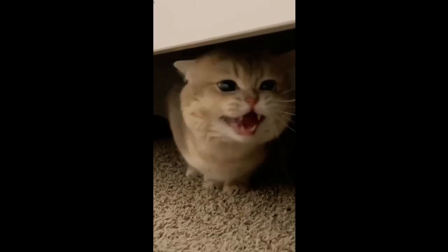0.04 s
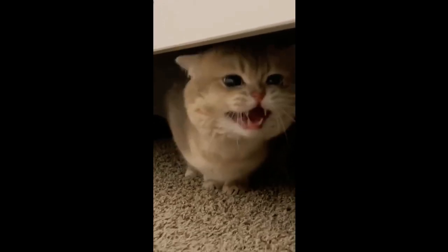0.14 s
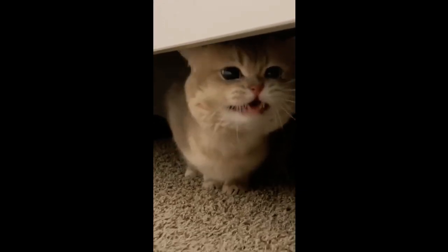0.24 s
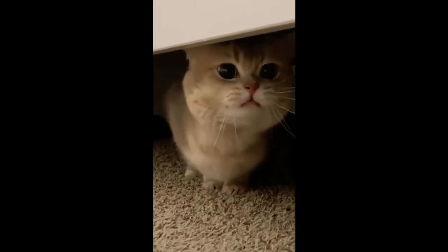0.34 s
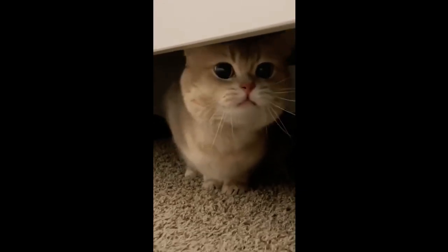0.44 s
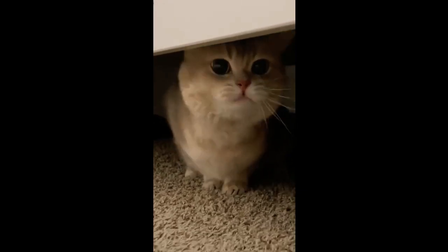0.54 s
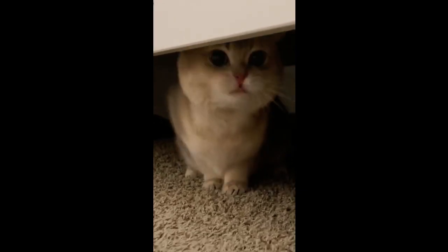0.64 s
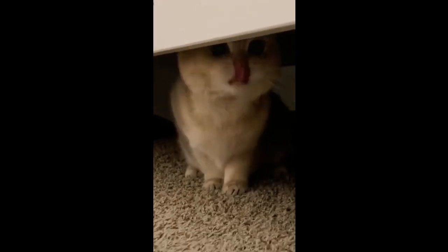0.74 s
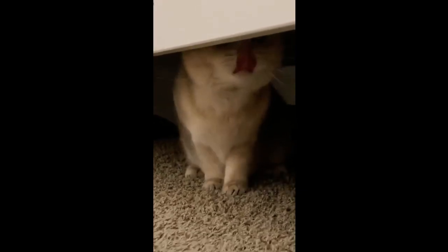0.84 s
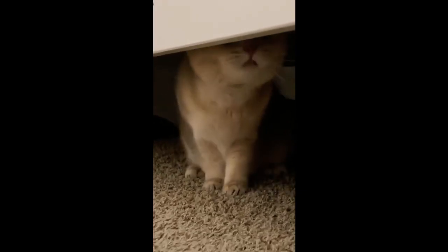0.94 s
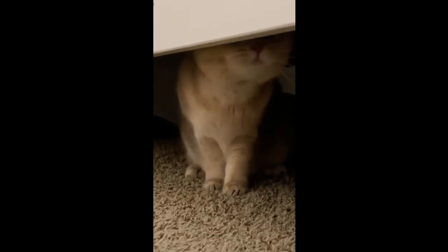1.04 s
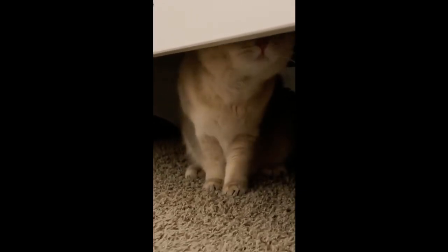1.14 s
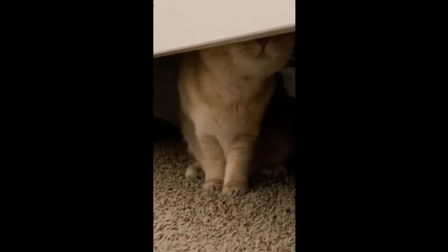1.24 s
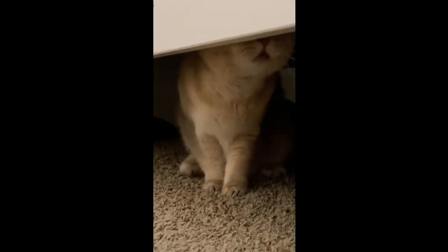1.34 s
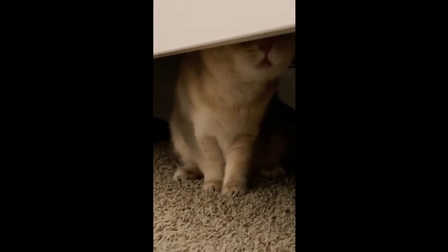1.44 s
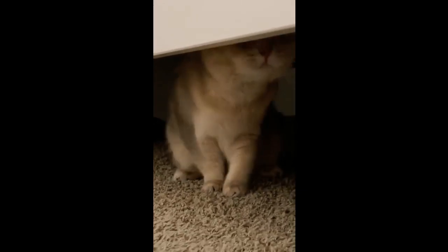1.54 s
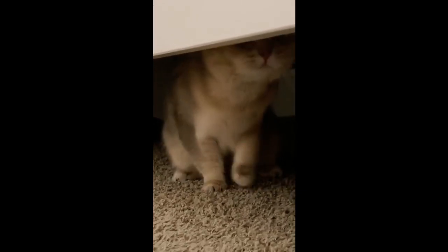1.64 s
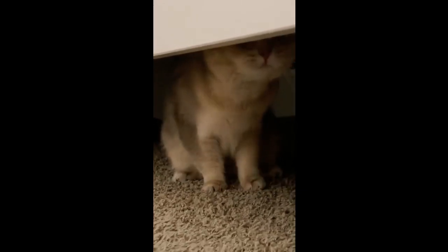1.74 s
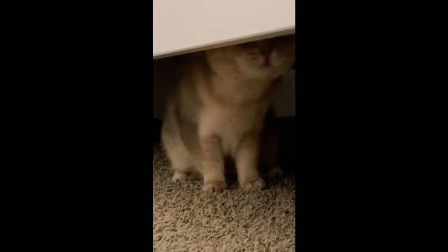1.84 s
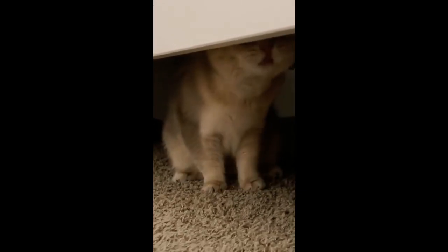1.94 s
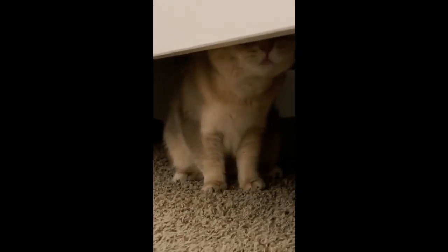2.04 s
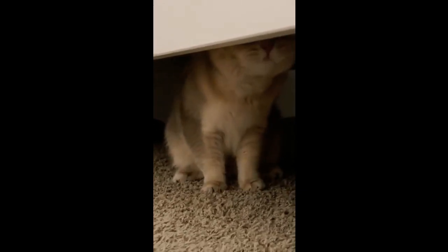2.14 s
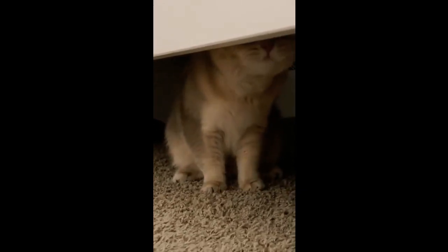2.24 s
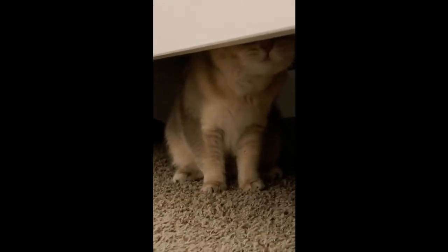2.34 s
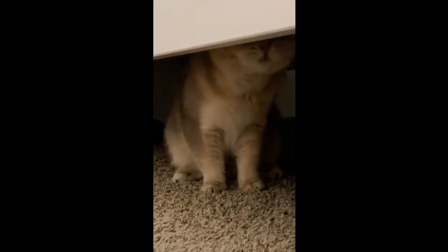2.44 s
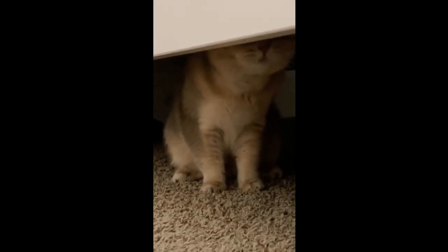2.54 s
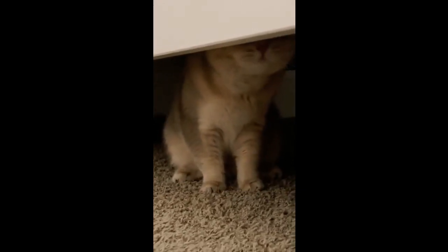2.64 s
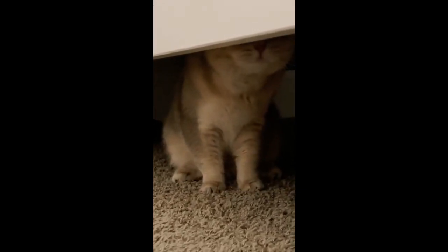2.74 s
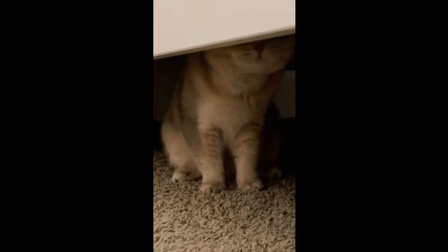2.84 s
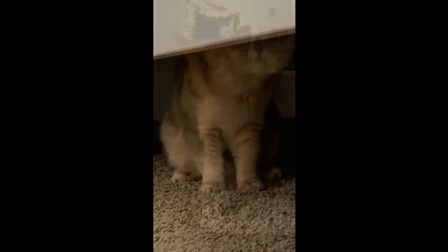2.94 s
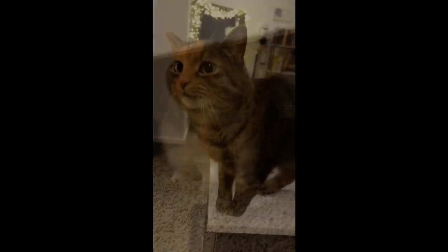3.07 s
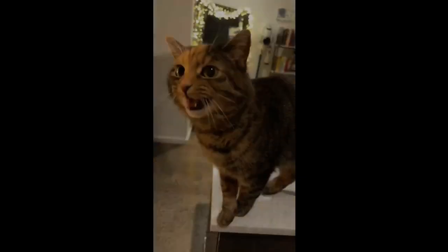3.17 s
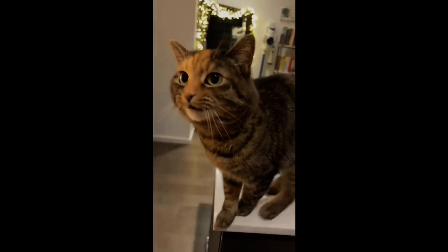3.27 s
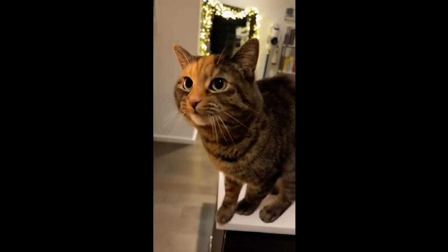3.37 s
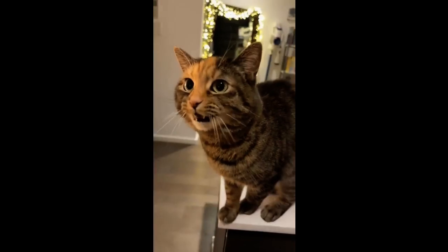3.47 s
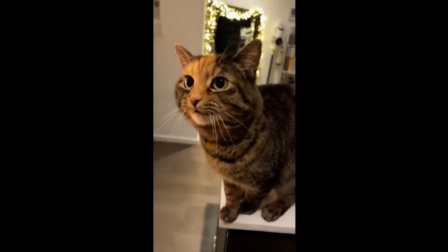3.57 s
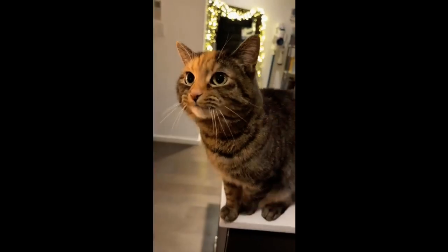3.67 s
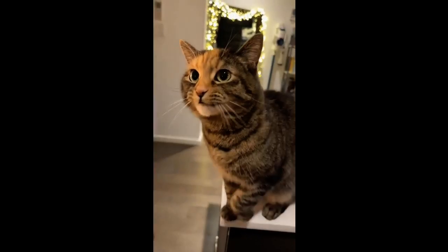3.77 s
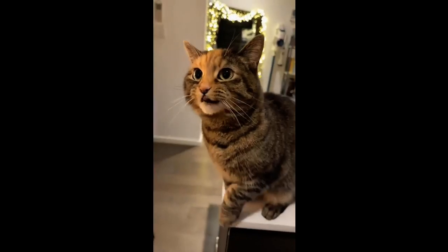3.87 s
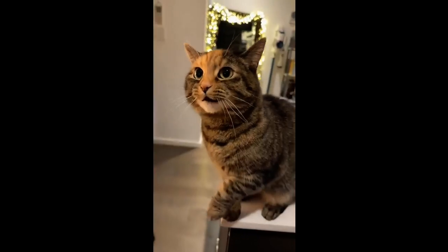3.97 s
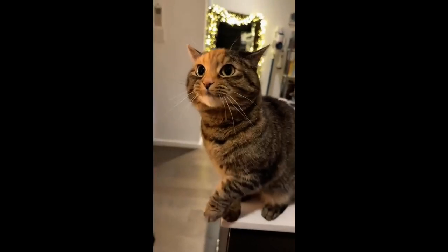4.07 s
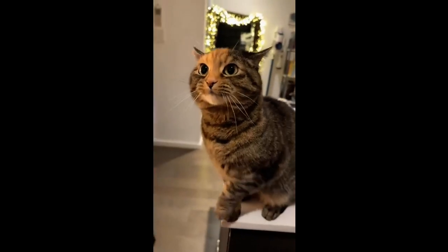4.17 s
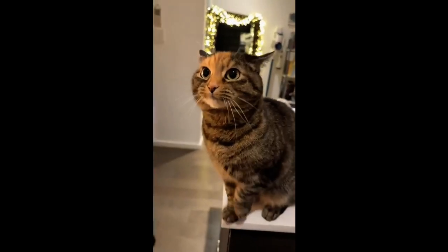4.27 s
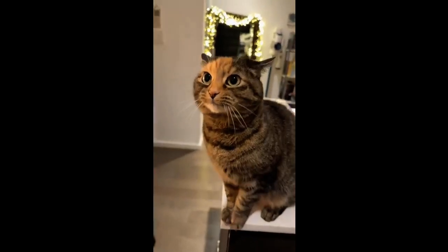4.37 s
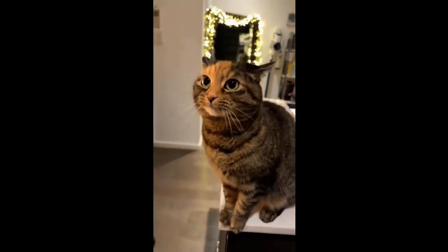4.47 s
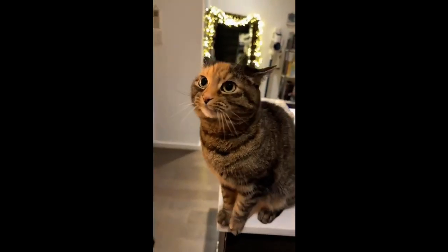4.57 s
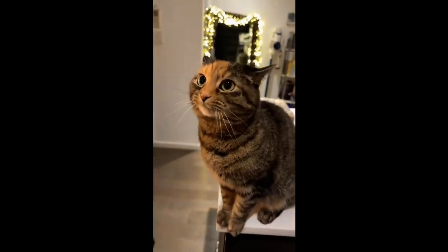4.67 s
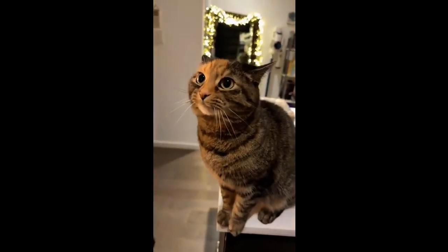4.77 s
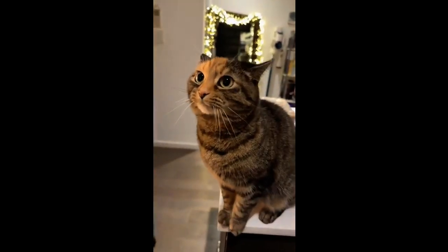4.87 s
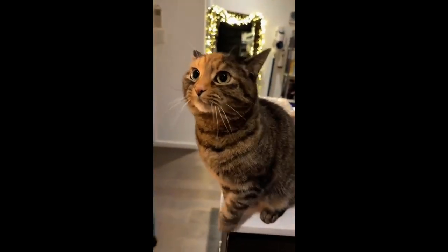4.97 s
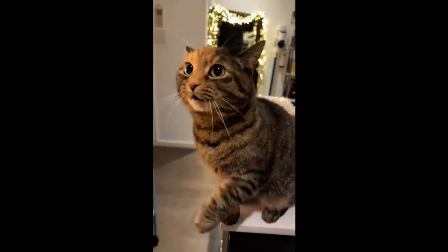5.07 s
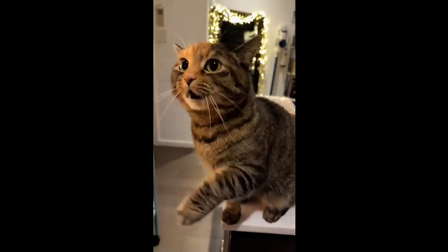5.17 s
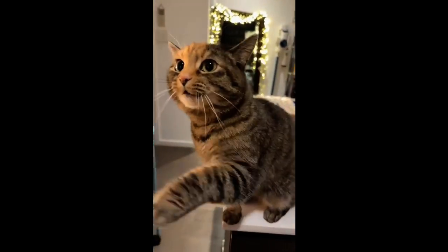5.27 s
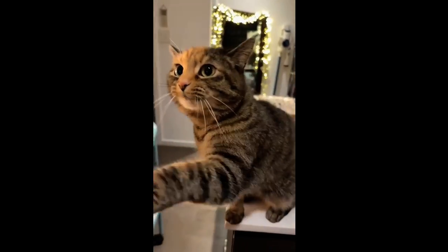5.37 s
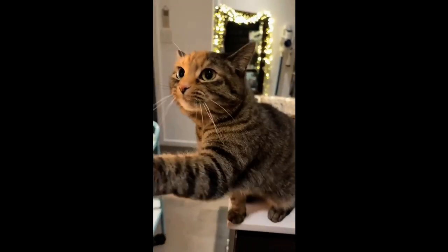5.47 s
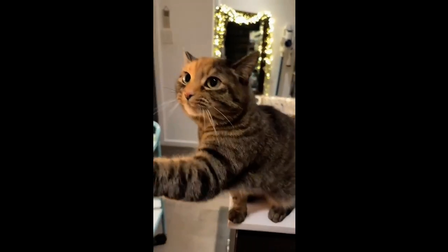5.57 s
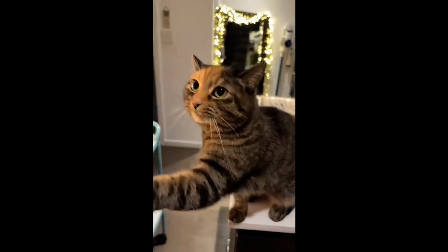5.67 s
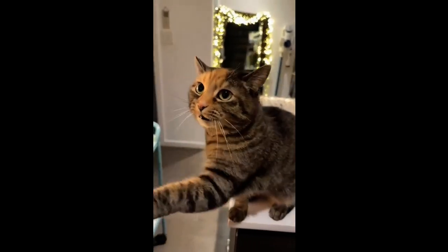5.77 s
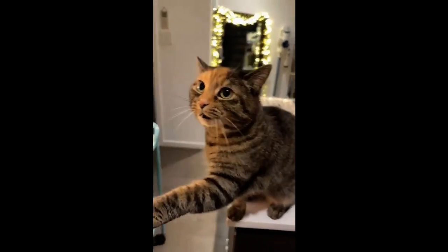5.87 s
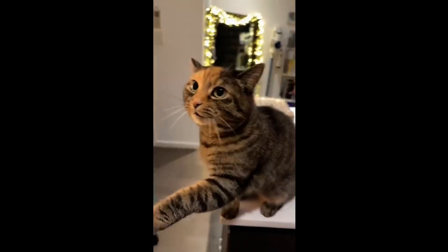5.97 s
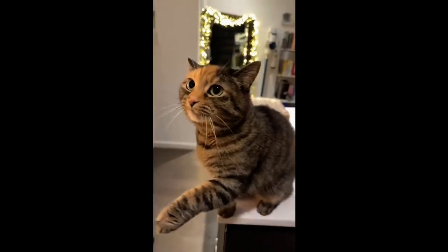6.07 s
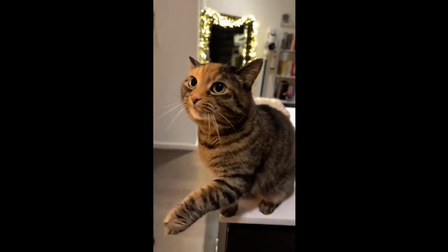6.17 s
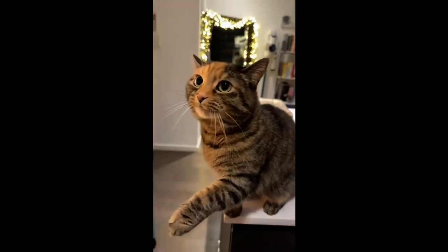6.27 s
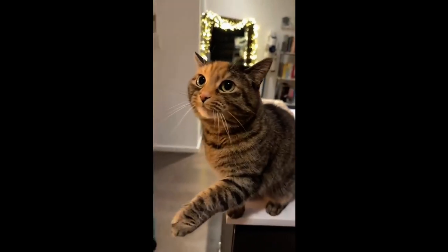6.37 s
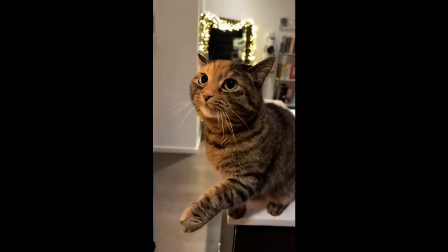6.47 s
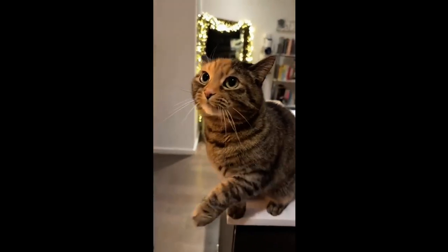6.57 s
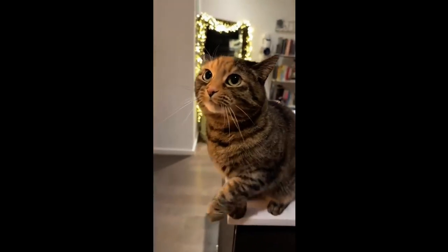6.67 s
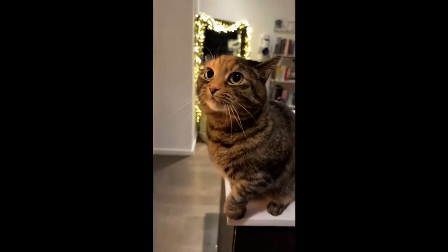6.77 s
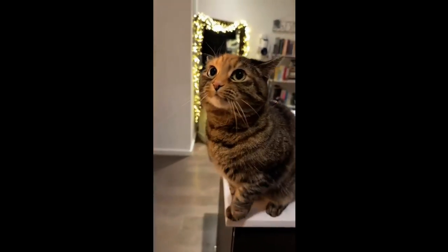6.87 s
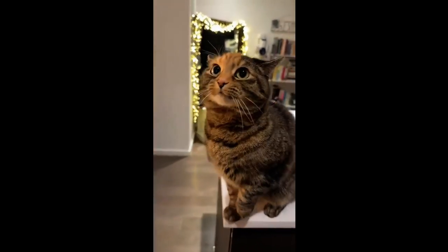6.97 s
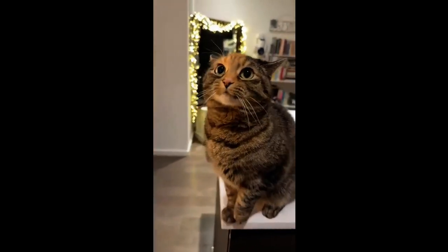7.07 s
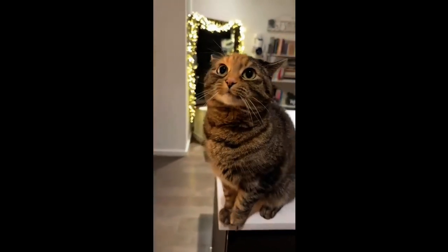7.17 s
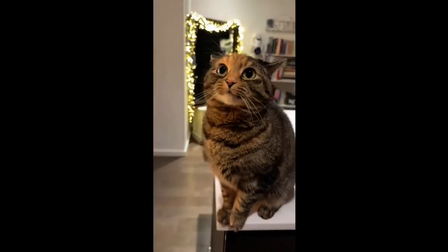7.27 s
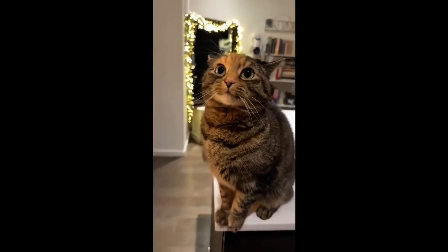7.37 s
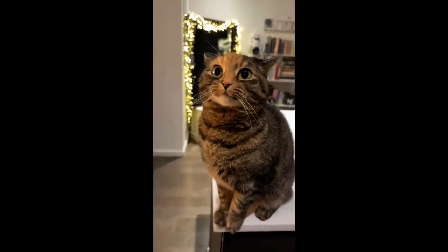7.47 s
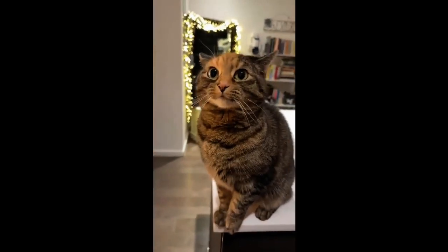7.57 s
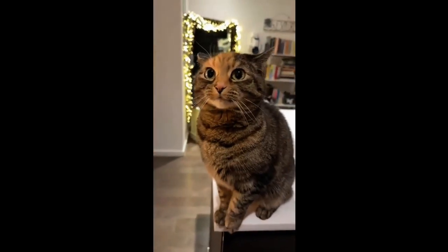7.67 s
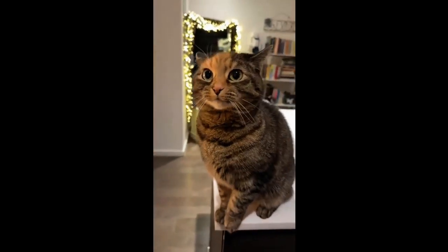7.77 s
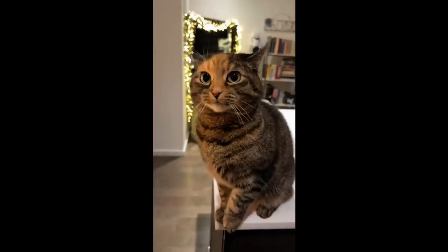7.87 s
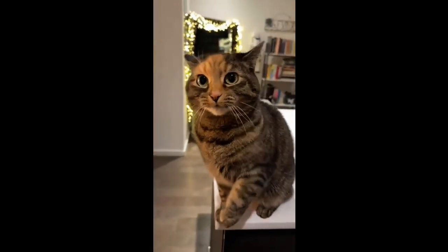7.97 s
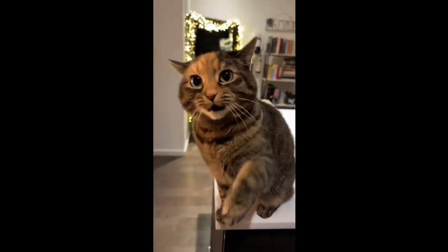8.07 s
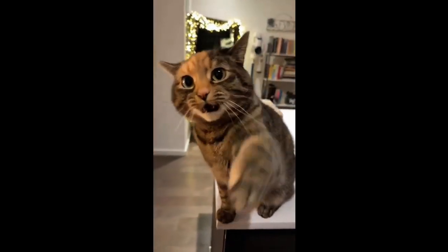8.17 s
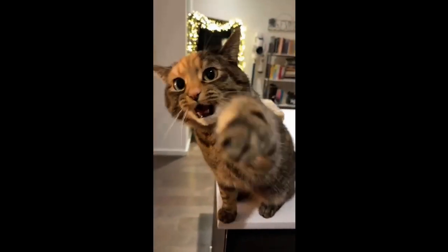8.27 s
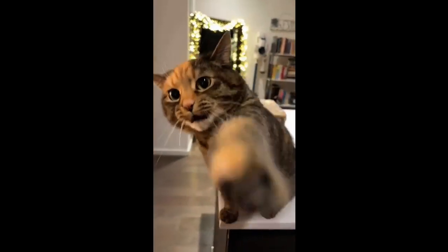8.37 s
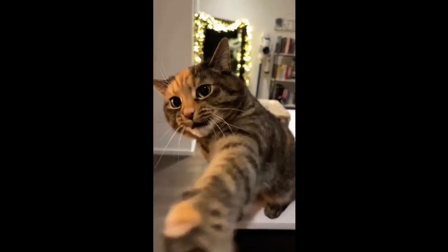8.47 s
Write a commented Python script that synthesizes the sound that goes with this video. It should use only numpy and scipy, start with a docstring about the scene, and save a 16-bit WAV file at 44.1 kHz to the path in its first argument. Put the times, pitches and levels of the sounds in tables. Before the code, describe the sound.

A steady low hum with bassy room noise fills the first 3.3 seconds. At 0 a small cat is already in a loud, close, wide-mouthed meow, rough and sliding downward, with a tiny squeak near 0.35, flipping to a thin higher tail and ending by 0.6. Soft mouth noises follow. From 0.85 to 1.6 comes a throaty, fluttering trill that jumps up into a thin mew. Little ticks and rustles lead to another hoarse trill at 2.8, with whistly squeaks near 3.2, cut off by a dry click at 3.33. The room becomes much quieter, with faint hum. A second cat, softer, gives a short mew at 3.5, a breathy, weak rising one at 4.0-4.5, a level nasal one at 5.1-5.4, a creaky rising meow at 5.6-6.25, faint rustles, near silence, then a longer quavering, pleading meow from 8.0 to the end.

```python
"""Indoors at home: a small cat under furniture meows and trills close by, over a low hum;
after a click, in a quieter room, a tabby gives five softer meows. A call is a stack of harmonics with
a pitch and a level. The jaw moves the sound from the fundamental up into a rising mouth resonance;
in creaky spells the voice turns hoarse and flutters, and at times its pitch quavers.
Shaped noise and wavering tones make the rooms, noise bursts the rustles, beaten tones the squeaks."""
import sys
import numpy as np
from scipy import signal
from scipy.fft import rfft, irfft, next_fast_len
from scipy.io import wavfile
from scipy.ndimage import uniform_filter1d

SR = 44100
rng = np.random.default_rng(int(sys.argv[2]) if len(sys.argv) > 2 else 0)


def wrap_up_sound(samples):
    """Save the sound to the file named by the first command line argument, as 16-bit audio."""
    columns = np.atleast_2d(samples).T
    # keep every value between -1 and 1, then stretch to whole-number steps
    tamed = np.clip(columns, -1, 1)
    steps = np.round(tamed * 32767).astype(np.int16)
    wavfile.write(sys.argv[1], SR, steps)


N = 375732
TIME = np.arange(N) / SR
# Harmonics near and above this turn to hiss, by kind of voice
CLEAR_HZ, BREATHY_HZ, HUSKY_HZ = 10500, 6500, 1800


def undb(db):
    """Logarithmic level: decibels to amplitude gain."""
    return 10 ** (np.asarray(db) / 20)


def unit(x):
    """Power normalisation: scale to rms 1."""
    return x / np.sqrt(np.mean(np.abs(x) ** 2))


def colour(hz, points):
    """Spectral envelope: gain of a (Hz, dB) curve, interpolated over log frequency."""
    f, db = np.transpose(points)
    return undb(np.interp(np.log(np.maximum(hz, 1)), np.log(f), db))


def resonance(hz, centre_hz, width_hz):
    """Damped oscillator: complex response of one resonance, 1 at its centre."""
    return 1j * hz * width_hz / (centre_hz ** 2 - hz ** 2 + 1j * hz * width_hz)


def filtered(x, shape):
    """Linear filtering: multiply the spectrum of x by the response shape(Hz)."""
    size = next_fast_len(len(x) + 2048)
    hz = np.arange(size // 2 + 1) * SR / size
    return irfft(rfft(x, size) * shape(hz), size)[:len(x)]


def noise(n, shape):
    """Coloured noise: white noise filtered by shape(Hz), at rms 1."""
    return unit(filtered(rng.standard_normal(n), shape))


def wander(n, hz):
    """Low-pass random motion of rms 1, up to about hz."""
    return noise(n, lambda f: 1 / (1 + (f / hz) ** 2) ** 2)


def flicker(n, hz):
    """Narrow-band noise envelope: random amplitude and phase of rms 1, changing at up to about hz."""
    return unit(wander(n, hz) + 1j * wander(n, hz))


def background(spectrum, lines, noise_db, lines_db, waver, spread_hz):
    """Diffuse air noise, central in the bass and wide above spread_hz, plus an appliance's line spectrum."""
    mid = noise(N, lambda f: colour(f, spectrum))
    side = noise(N, lambda f: colour(f, spectrum))
    side = filtered(side, lambda f: (f / (f + spread_hz)) ** 1.8)
    hum = 0
    for hz, db in lines:
        wavering = 1 + waver * flicker(N, 10)
        hum = hum + undb(db) * np.sqrt(2) * np.real(wavering * np.exp(2j * np.pi * hz * TIME))
    return undb(noise_db) * (mid + np.array([side, -side])) + undb(lines_db) * hum


def humming_room():
    """Low-frequency noise with steady hum lines that waver at random."""
    # Each row: frequency in Hz, relative noise density in dB
    spectrum = [(20, -30.5), (55, -3.5), (165, 4), (240, -10), (340, -16.5), (480, -24), (750, -50.5),
                (12000, -56), (14500, -76)]
    # Each row: frequency of a hum line in Hz, level in dB before lines_db
    lines = [(59.5, -28.5), (113, -34), (171, -40)]
    return background(spectrum, lines, noise_db=-29.0, lines_db=-4.0, waver=0.8, spread_hz=2500)


def quiet_room():
    """The same noise and hum mechanism at a lower level, wavering less."""
    # Each row: frequency in Hz, relative noise density in dB
    spectrum = [(20, -16), (80, -1), (120, -11), (300, -3), (400, -10), (800, -13), (1100, -24),
                (1900, -25), (9000, -48.5), (14000, -81)]
    # Each row: frequency of a hum line in Hz, level in dB before lines_db
    lines = [(84.5, -60), (168, -58), (296, -60)]
    return background(spectrum, lines, noise_db=-50.5, lines_db=-0.5, waver=0.4, spread_hz=630)


def rustles():
    """Transient friction: bursts of resonant noise that rise quickly and die away."""
    # Small mouth noises and soft rustles. Each row: start in seconds, length in seconds,
    # level in dB before the envelope, centre in Hz, resonance width in Hz
    bursts = [(0.572, 0.048, -53.5, 2675, 1820), (0.618, 0.045, -58.5, 7960, 6050),
              (1.303, 0.0034, -38.5, 2700, 2600), (1.547, 0.054, -47, 2590, 2500),
              (2.013, 0.084, -48.5, 10520, 1994), (2.042, 0.046, -40.5, 9350, 2196),
              (2.537, 0.055, -51.5, 9800, 2970), (2.976, 0.028, -35, 2130, 700),
              (4.364, 0.16, -63, 6150, 3060), (5.56, 0.0084, -57.5, 5500, 4000),
              (6.216, 0.04, -65, 3990, 4000), (6.425, 0.14, -63, 4400, 4990)]
    out = np.zeros(N)
    for s, length, db, centre_hz, width_hz in bursts:
        u = np.arange(int(2 * length * SR)) / (length * SR)
        burst = noise(len(u), lambda f: resonance(f, centre_hz, width_hz) ** 2)
        envelope = np.minimum(u * 10, 1) * np.exp(-2 * u ** 2)
        start = int(s * SR)
        out[start:start + len(u)] += undb(db) * burst * envelope
    return out


def click():
    """Critically damped impulse: one dry, sharp click as the first room breaks off."""
    # The row: start in seconds, peak in dB, cut-off in Hz
    s, peak_db, cut_hz = (3.3335, -19.5, 3200)
    u = 2 * np.pi * cut_hz * np.clip(TIME - s, 0, .01)
    return undb(peak_db) * u * np.exp(1 - u)


def room(x, t60, wet_db, side_db, early_db):
    """Reverberation by convolution: early reflections and a dull tail, with the two sides out of step."""
    # Stereo width of the voices. Each row: frequency in Hz, side level in dB before side_db
    width = [(350, -25.5), (700, -0.5), (2700, -1.5), (5000, 5.5)]
    # Reflections from nearby surfaces: their decay time, and the frequency above which they count
    early_s, early_hz = .005, 3500
    t = TIME[:SR // 2]
    wet = []
    for _ in range(2):
        tail = noise(len(t), lambda f: 1 / (1 + f / 4000))
        tail = tail * undb(-60 * t / t60) * (t > .006)
        early = noise(len(t), lambda f: f ** 2 / (f ** 2 + early_hz ** 2))
        early = early * np.exp(-t / early_s) * (t > .001)
        response = undb(wet_db) * tail / np.linalg.norm(tail)
        response = response + undb(early_db) * early / np.linalg.norm(early)
        wet.append(signal.fftconvolve(x, response)[:N])
    side = undb(side_db) * filtered(x, lambda f: 1j * colour(f, width))  # a quarter cycle ahead
    return x + np.array(wet) + np.array([side, -side])


def squeak(curve):
    """Amplitude modulation: the tightening throat chops a thin whistle, which gives it sidebands."""
    beat_hz, beat_depth = 495, 0.55
    s, pitches, levels = np.transpose(curve)
    span = (TIME > s[0]) & (TIME < s[-1])
    t = TIME[span]
    pitch = uniform_filter1d(np.interp(t, s, pitches), size=300)
    pitch = pitch * (1 + 0.011 * wander(len(t), 300))
    beat = 2 * np.pi * np.cumsum(beat_hz * (1 + 0.092 * wander(len(t), 200))) / SR
    chop = unit(np.exp(beat_depth * np.cos(beat)))
    whistle = np.sqrt(2) * np.sin(2 * np.pi * np.cumsum(pitch) / SR)
    out = np.zeros(N)
    out[span] = undb(np.interp(t, s, levels)) * chop * whistle
    return out


def creak(t):
    """Irregular phonation: roughness and complex flutter of the throat, the rate gliding in each spell."""
    # Each row: start in seconds, end in seconds, roughness 0-1, first flutter rate in Hz,
    # last flutter rate in Hz, flutter depth 0-1
    spells = [(0.074, 0.227, 0.56, 41.7, 41, 0.18), (0.236, 0.401, 0.53, 33.04, 31.1, 0.41),
              (1.499, 1.56, 0.31, 38, 36.4, 0.15), (0.859, 1.187, 0.94, 41.75, 37, 0.51),
              (2.82, 3.233, 0.95, 45.37, 31.94, 0.45), (3.457, 3.485, 0.28, 39.4, 39.7, 0.42),
              (4.039, 4.113, 0.75, 45.2, 40.1, 0.04), (5.335, 5.348, 0.28, 40, 40, 0),
              (5.607, 5.754, 0.88, 36.7, 35.5, 0.46), (5.859, 5.917, 0.02, 38, 35.9, 0.07),
              (8.144, 8.158, 0.14, 42.7, 36, 0.15), (8.332, 8.352, 0.17, 33, 33.6, 0.17)]
    fade_s = 0.038  # before the start and after the end
    clear_roughness = 0.087  # between the creaks
    rough, flutter = np.full(len(t), clear_roughness), 0
    for start, end, roughness, first_hz, last_hz, depth in spells:
        gate = np.clip(1 + np.minimum(t - start, end - t) / fade_s, 0, 1)
        progress = np.clip((t - start) / (end - start), 0, 1)
        beats = first_hz * (t - start) + np.cumsum((last_hz - first_hz) * progress ** 2) / SR
        rough = np.maximum(rough, roughness * gate)
        flutter = flutter + depth * gate * np.exp(2j * np.pi * beats)
    return rough, flutter


def quaver(t):
    """Frequency modulation: factor by which the pitch swings, most in the middle of each spell."""
    # Each row: middle in seconds, length in seconds, rate in Hz, swing as a share of the pitch
    spells = [(8.143, 0.185, 53, 0.071), (5.29, 0.21, 11.36, 0.014)]
    factor = 1
    for s, length, hz, swing in spells:
        envelope = np.cos(np.pi * np.clip((t - s) / length, -.5, .5))
        factor = factor + swing * envelope * np.cos(2 * np.pi * hz * (t - s))
    return factor


def larynx(t, pitch, jitter):
    """Vocal-fold oscillation: phase, puffs of a trill and roughness; the pitch sags through each puff."""
    sag = 0.13  # share of the pitch per unit of flutter
    scatter = 0.17  # share by which one puff differs from the next
    rough, flutter = creak(t)
    flutter = flutter * (1 + scatter * wander(len(t), 60))
    puffs = (1 + flutter.real) / np.sqrt(1 + np.abs(flutter) ** 2 / 2)
    unsteady = jitter * rough * wander(len(t), 220) + 0.0035 * wander(len(t), 50)
    pitch = pitch * quaver(t) * (1 - sag * flutter.imag + unsteady)
    return 2 * np.pi * np.cumsum(pitch) / SR, puffs, rough


def mouth_shape(t, shapes, closed_hz):
    """Articulation: jaw opening blends the mouth shapes and lifts the mouth resonance."""
    # The jaw opens, holds and closes. Each row: time fully open in seconds, opening time before it
    # in seconds, hold in seconds, closing time in seconds, opening 0-1, open mouth resonance in Hz
    gapes = [(0, .01, 0.037, 0.14, 1, 2900), (0.128, .05, 0.098, 0.11, 0.39, 2130),
             (0.301, .05, 0.15, 0.073, 0.12, 1808), (0.474, 0.035, 0.018, 0.039, 0.31, 2148),
             (1.046, 0.13, 0.14, 0.042, 0.56, 921), (1.368, 0.19, 0.18, 0.073, 0.96, 1860),
             (2.985, 0.011, 0.0097, 0.054, 0.39, 1011), (3.223, 0.07, 0.047, 0.064, 0.54, 1028),
             (3.531, 0.094, 0.069, 0.037, 0.83, 2070), (4.046, 0.041, 0.08, 0.14, 0.59, 1760),
             (4.454, .07, .04, .05, 0.32, 1382), (5.179, 0.047, 0.14, 0.035, 0.53, 1366),
             (5.849, 0.055, 0.017, 0.085, 0.34, 2550), (5.894, 0.03, 0.011, 0.17, 0.47, 2610),
             (6.028, 0.13, 0.038, 0.025, 0.32, 1870), (8.121, 0.066, 0.049, 0.054, 0.65, 1570),
             (8.148, 0.028, 0.017, 0.051, 0.75, 2080), (8.206, 0.046, 0.025, .03, 0.55, 1860),
             (8.247, 0.018, 0.017, 0.027, 0.7, 2380), (8.285, 0.14, 0.085, 0.27, 0.87, 2100),
             (8.479, 0.099, 0.038, 0.12, 0.67, 1560)]
    opening, mouth_hz = 0, closed_hz
    for s, rise, hold, fall, size, open_hz in gapes:
        gape = np.clip(np.minimum(1 + (t - s) / rise, 1 - (t - s - hold) / fall), 0, 1)
        opening = np.maximum(opening, size * gape)
        mouth_hz = np.maximum(mouth_hz, closed_hz + (open_hz - closed_hz) * gape)
    steps = np.linspace(0, 1, len(shapes))
    return [np.interp(opening, steps, column) for column in np.transpose(shapes)], mouth_hz


def voicing(t, call, shapes, closed_hz, effort, treble_effort, octave_slope_db,
            creak_mouth_db, creak_treble_db):
    """Spectral balance: effort brightens the voice, creak reweights it, and the octave follows the pitch."""
    octave_pitch_hz = 500  # the pitch at which octave_slope_db leaves the octave unchanged
    s, pitches, levels = np.transpose(call)
    pitch = uniform_filter1d(np.interp(t, s, pitches), size=220)
    level = uniform_filter1d(np.interp(t, s, levels), size=220)
    (first, second, mouth, treble), mouth_hz = mouth_shape(t, shapes, closed_hz)
    rough, _ = creak(t)
    below_peak = level - levels.max()
    overtones = level + effort * below_peak
    first_db = level + first
    second_db = overtones + second + octave_slope_db * np.log2(pitch / octave_pitch_hz)
    mouth_db = overtones + mouth + creak_mouth_db * rough
    treble_db = overtones + treble + treble_effort * below_peak + creak_treble_db * rough
    return pitch, level, first_db, second_db, mouth_db, mouth_hz, treble_db


def meow(call, shapes, throat, mouth_width_hz, jitter, rasp, airy_hz, ring_db, **voice_rules):
    """Source and filter: harmonics of an unsteady larynx; the higher ones break up first when rough."""
    span = (TIME >= call[0][0]) & (TIME <= call[-1][0])
    t = TIME[span]
    (pitch, level_db, first_db, second_db,
     mouth_db, mouth_hz, treble_db) = voicing(t, call, shapes, **voice_rules)
    phase, puffs, rough = larynx(t, pitch, jitter)
    k = np.arange(1, 33)[:, None]
    hz = k * pitch
    # each line trades part of its power for a skirt of noise that pulses with the cycle;
    # the lower ones keep their tone
    smear = rasp * rough ** 2 * (hz / 2300) ** 2 + (hz / airy_hz) ** 5
    smear = np.minimum(smear, hz / 1500)
    skirt = np.array([flicker(len(t), 65 * (order + 1)) for order in k[:, 0]])  # wider on higher lines
    pulsing = skirt * (1 + .5 * np.cos(phase))
    swell = (1 + np.sqrt(smear) * pulsing) / np.sqrt(1 + smear)
    # the harmonics are staggered, so that each cycle is spread out rather than a spike
    stagger = np.pi * k ** 2 / 3
    lines = np.sqrt(2) * np.real(swell * np.exp(1j * k * phase - 1j * stagger))
    low = lines[0] * undb(first_db) + lines[1] * undb(second_db)
    low = filtered(low, lambda f: f ** 4 / (f ** 4 + 190 ** 4))  # a small throat radiates little bass
    # from the third harmonic up, the moving mouth resonance and the bright top both pass the fixed throat
    upper = 1 / (1 + (3450 / hz) ** 24)
    mouth = np.abs(resonance(hz, mouth_hz, mouth_width_hz)) * (1 - upper) * (k > 2)
    throat_gain = colour(hz, throat)
    gains = 0
    for band, db in ((mouth, mouth_db), (upper, treble_db)):
        gains = gains + band * undb(db) / np.linalg.norm(band * throat_gain, axis=0)
    high = filtered((gains * lines).sum(axis=0), lambda f: colour(f, throat))
    # ragged cycles also ring the mouth at its own frequency, between the harmonics
    ring_hz = mouth_hz + .17 * mouth_width_hz * wander(len(t), 250)
    ring = np.sin(2 * np.pi * np.cumsum(ring_hz) / SR) * undb(level_db + ring_db) * rough ** 2
    voice = (low + ring) * puffs + high * np.abs(puffs) ** 0.65  # the high part throbs less
    fade = np.clip(np.minimum(t - t[0], t[-1] - t) / 0.003, 0, 1)
    out = np.zeros(N)
    out[span] = voice * fade
    return out


def tabby():
    """Narrow mouth resonance, so that one harmonic at a time stands out in five soft meows."""
    # Calls. Each row: time in seconds, pitch in Hz, level in dB before the mouth shape
    short_mew = [(3.465, 478, -45.5), (3.495, 531, -37), (3.539, 574.3, -37.5), (3.589, 535, -40.5),
                 (3.62, 502, -49.5)]
    raspy_mew = [(4.025, 467, -51), (4.042, 495, -47), (4.09, 488, -44.5), (4.125, 520, -47),
                 (4.18, 600, -47), (4.235, 648, -46.5), (4.31, 658, -49), (4.4, 648, -48.5),
                 (4.455, 614, -50), (4.49, 652, -53.5), (4.52, 660, -52)]
    level_mew = [(5.09, 465, -56.5), (5.106, 421, -40), (5.126, 501, -41), (5.14, 497, -37),
                 (5.158, 460.5, -36.5), (5.186, 487, -35), (5.308, 481, -36.5), (5.342, 469, -37),
                 (5.365, 470, -64)]
    rising_meow = [(5.61, 445, -47), (5.68, 447, -39.5), (5.7, 397.5, -43.5), (5.798, 414, -39.5),
                   (5.834, 418, -37), (5.872, 447.5, -36), (5.902, 517, -35.5), (5.93, 571.5, -37),
                   (6.0, 626, -38.5), (6.06, 639, -40.5), (6.144, 660, -49), (6.204, 688, -53),
                   (6.245, 756, -51)]
    begging_meow = [(8.025, 471, -44.5), (8.068, 503, -40), (8.112, 516.4, -34), (8.158, 499, -36),
                    (8.204, 455, -37), (8.222, 496, -38), (8.236, 470, -39.5), (8.322, 495, -39.5),
                    (8.364, 511, -41), (8.422, 538, -42), (8.52, 515, -40)]
    # Mouth shapes: closed, half open, wide. Each row: fundamental, octave, mouth and treble levels,
    # all in dB relative to the call
    plain_mouth = [(-0.5, -6.5, -16.5, -38), (-9.5, -1, 0, -24), (-16, -6, 6.5, -3.5)]
    hummed_mouth = [(1.5, -11.5, -40, -39), (-13, 0.5, -0.5, -25), (-2, -9, 5, -16)]
    # Fixed throat resonances. Each row: frequency in Hz, relative gain in dB
    plain_throat = [(2700, 24), (3200, 6), (3950, 6.5), (4750, -6), (5700, 3.5), (6700, -3), (8000, 1.5),
                    (9400, -0.5), (10400, -18), (12500, -43)]
    nasal_throat = [(1450, 20), (1950, 16.5), (2450, 22.5), (2950, 15.5), (3400, -1), (4500, -6), (5500, 7),
                    (6700, -18), (7700, 1), (9400, 2), (10400, -16), (12500, -39)]
    rounded_throat = [(1250, 41), (1450, 40), (2650, 21.5), (3200, 0), (4300, -18), (5300, -1), (6200, -6),
                      (7600, -13), (9000, -12), (10200, -30), (12500, -41)]
    calls = [(short_mew, plain_mouth, plain_throat, CLEAR_HZ),
             (raspy_mew, hummed_mouth, plain_throat, BREATHY_HZ),
             (level_mew, plain_mouth, nasal_throat, CLEAR_HZ),
             (rising_meow, plain_mouth, rounded_throat, CLEAR_HZ),
             (begging_meow, plain_mouth, plain_throat, BREATHY_HZ)]
    out = np.zeros(N)
    for call, mouth, throat, airy_hz in calls:
        out += meow(call, mouth, throat, mouth_width_hz=430, jitter=0.054, rasp=4.5,
                    airy_hz=airy_hz, ring_db=-19, closed_hz=1410, effort=0.15, treble_effort=0.1,
                    octave_slope_db=2.5, creak_mouth_db=7.5, creak_treble_db=11.0)
    return out


def small_cat():
    """Wide-mouthed resonance in a loud meow, then fluttering phonation in two trills, with squeaks."""
    # Calls. Each row: time in seconds, pitch in Hz, level in dB before the mouth shape
    loud_meow = [(0, 555, -6.5), (.03, 557.5, -11), (.055, 539, -15), (.064, 523, -12.5), (.073, 530, -19),
                 (.085, 508.5, -9.5), (.096, 510, -16.5), (.12, 466, -13.5), (.15, 467.8, -12.5),
                 (.25, 432.7, -10), (.29, 409, -15), (.39, 382.5, -18.5), (.43, 435, -18),
                 (.474, 613, -25.5), (.52, 628.6, -30.5), (.575, 642, -43.5)]
    trill_meow = [(0.85, 386, -40), (0.902, 380.5, -22), (1.01, 353.5, -17), (1.044, 374.6, -19.5),
                  (1.098, 355.5, -18), (1.152, 363.6, -20.5), (1.162, 342, -23.5), (1.208, 341, -22),
                  (1.226, 475, -17.5), (1.238, 569, -27.5), (1.33, 617, -35), (1.365, 627, -28.5),
                  (1.46, 611.3, -24), (1.552, 575.6, -27.5), (1.58, 601, -39)]
    trill = [(2.82, 395.8, -33), (2.87, 366.5, -22), (2.918, 393.7, -18), (2.948, 371, -17.5),
             (3.066, 384, -15), (3.246, 346.2, -21), (3.302, 413, -14.5), (3.335, 595, -28)]
    # Mouth shapes: closed, half open, wide. Each row: fundamental, octave, mouth and treble levels,
    # all in dB relative to the call
    loud_mouth = [(4, -5.5, -22.5, -36), (-13, -8, 0, -17), (-20, -16.5, 1, -19)]
    trill_mouth = [(-0.5, -14, -32.5, -53.5), (-0.4, -15.5, -25, -31), (-3.5, -5.5, -1.5, -18)]
    # Fixed throat resonances. Each row: frequency in Hz, relative gain in dB
    wide_throat = [(1000, 0), (1330, 2), (1560, -11), (1800, 2), (2250, -1), (2600, 4), (3050, -5),
                   (3350, 2), (3750, -5), (4300, 3), (5500, -3), (6400, -13), (7000, -8), (7900, -10),
                   (8900, -25), (10200, -10), (11400, -14), (12300, -33), (14600, -33)]
    small_throat = [(1080, 4), (1370, 0.5), (1680, 13.5), (1900, 9.5), (2150, 0), (2480, 16), (3000, 11),
                    (3700, 14.5), (4400, 2), (5500, 10), (6300, 13), (7200, -4.5), (8500, -17), (9500, -12),
                    (10500, -25), (13500, -36)]
    trill_throat = [(1100, 1.5), (1370, -8.5), (1680, 10.5), (1880, 1.5), (2130, -7), (2450, 6), (3000, 2),
                    (3500, 9.5), (4200, -0.5), (7000, 1.5), (9400, 1.5), (10500, -31), (12000, -52)]
    # Thin whistles over the creaky voice, one curve each. Each row of a curve: time in seconds,
    # pitch in Hz, level in dB
    whistles = [
        [(.33, 2590, -48), (.352, 2750, -34), (.362, 2545, -48), (.372, 2720, -41), (.388, 2500, -39),
         (.405, 2410, -46)],
        [(3.172, 1745, -46), (3.186, 2076, -41), (3.196, 2337, -34), (3.21, 1984, -33), (3.226, 2260, -31),
         (3.24, 2100, -39), (3.254, 2400, -38), (3.28, 2500, -51)],
    ]
    out = meow(loud_meow, loud_mouth, wide_throat, mouth_width_hz=810, jitter=0.035, rasp=1.0,
               airy_hz=CLEAR_HZ, ring_db=-14.5, closed_hz=1700, effort=0.023, treble_effort=0.7,
               octave_slope_db=-11.5, creak_mouth_db=-0.5, creak_treble_db=20)
    out += meow(trill_meow, trill_mouth, small_throat, mouth_width_hz=520, jitter=0.037, rasp=3.0,
                airy_hz=CLEAR_HZ, ring_db=-8.5, closed_hz=838, effort=0.31, treble_effort=0,
                octave_slope_db=-13.5, creak_mouth_db=0, creak_treble_db=-12.5)
    out += meow(trill, trill_mouth, trill_throat, mouth_width_hz=510, jitter=0.03, rasp=3.0,
                airy_hz=HUSKY_HZ, ring_db=-8.5, closed_hz=935, effort=0.46, treble_effort=0,
                octave_slope_db=-9.5, creak_mouth_db=11.5, creak_treble_db=6.0)
    return out + sum(squeak(curve) for curve in whistles)


def scene():
    """Superposition: the small cat in the humming room, then the tabby in the quiet one."""
    change_s, crossfade_s = 3.338, 0.00051
    first = humming_room()
    first += room(small_cat(), t60=0.97, wet_db=-34.5, side_db=-17.0, early_db=-11.5)
    second = quiet_room()
    to_left = undb([[.7], [-.7]])
    second += room(tabby(), t60=0.35, wet_db=-18, side_db=-16.5, early_db=-3) * to_left
    change = np.clip((TIME - change_s) / crossfade_s, 0, 1)
    return first * (1 - change) + second * change + click() + rustles()


def record(dry):
    """Band limiting: the microphone clips at full scale and passes almost nothing above its cut-off."""
    top_hz = 15400
    low_pass = signal.ellip(8, .2, 80, top_hz, fs=SR, output="sos")
    return signal.sosfilt(low_pass, np.clip(dry, -1, 1))


dry = scene()
out = record(dry)
wrap_up_sound(out)
```